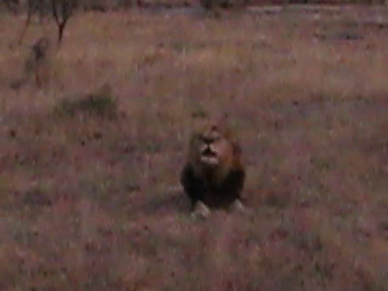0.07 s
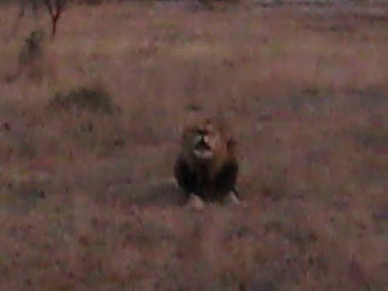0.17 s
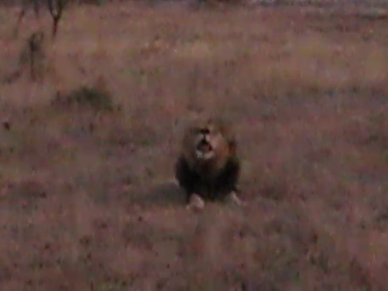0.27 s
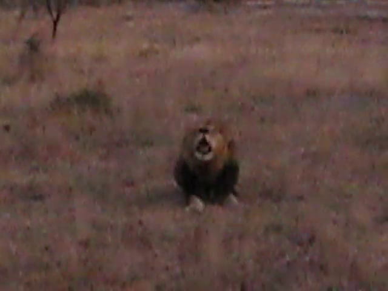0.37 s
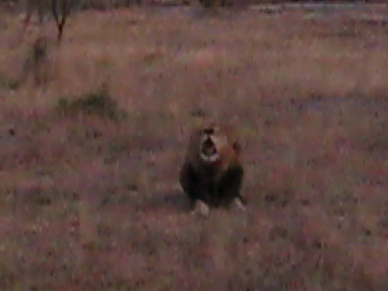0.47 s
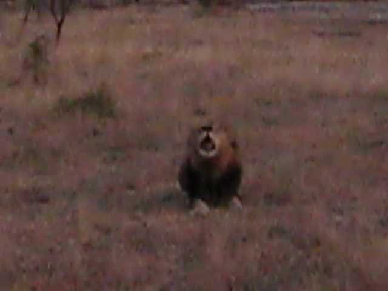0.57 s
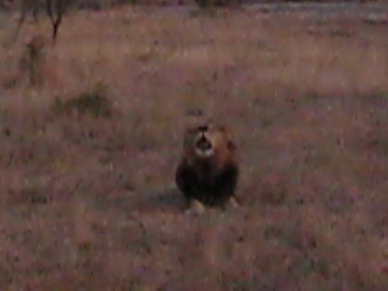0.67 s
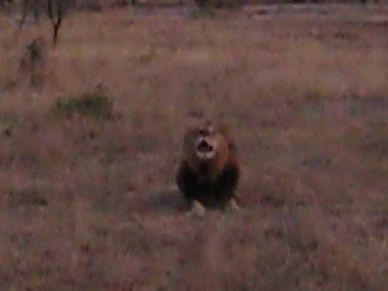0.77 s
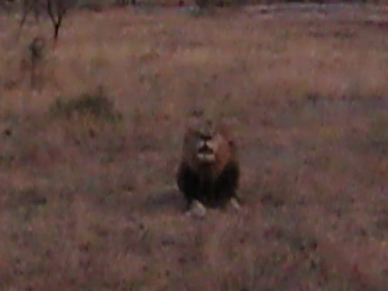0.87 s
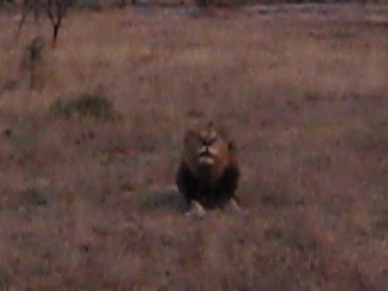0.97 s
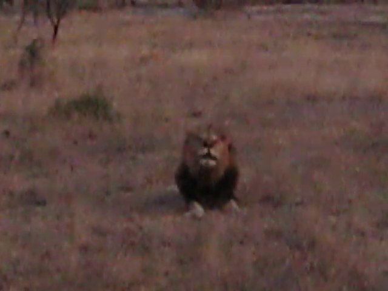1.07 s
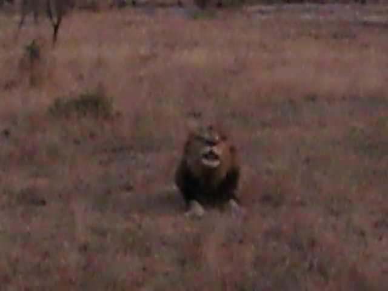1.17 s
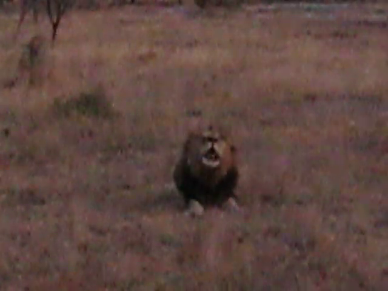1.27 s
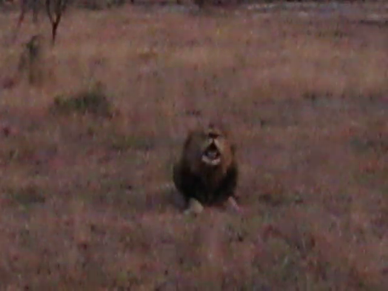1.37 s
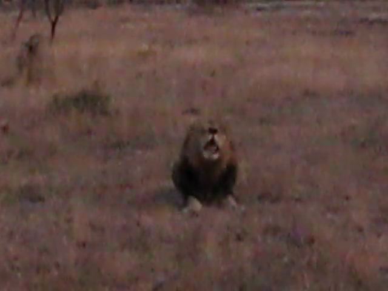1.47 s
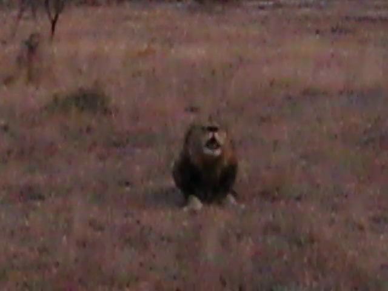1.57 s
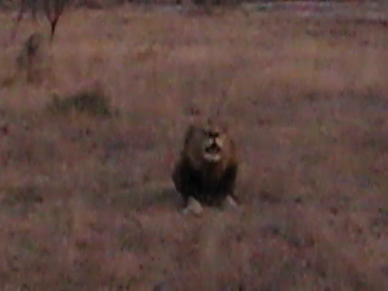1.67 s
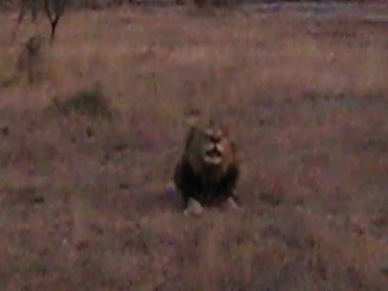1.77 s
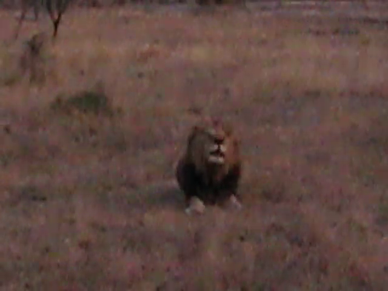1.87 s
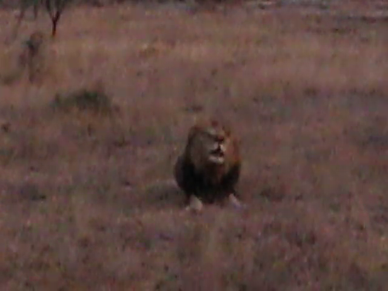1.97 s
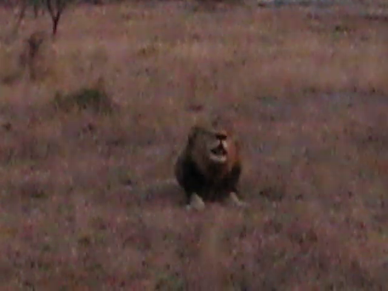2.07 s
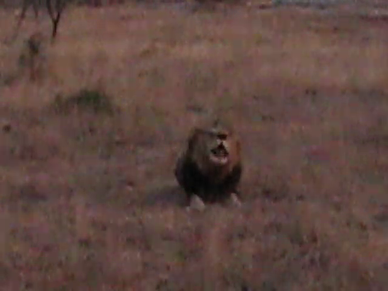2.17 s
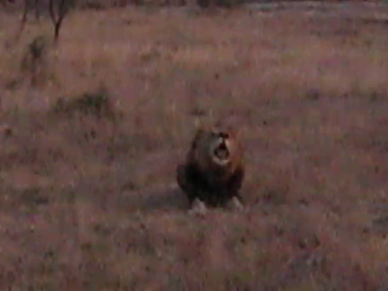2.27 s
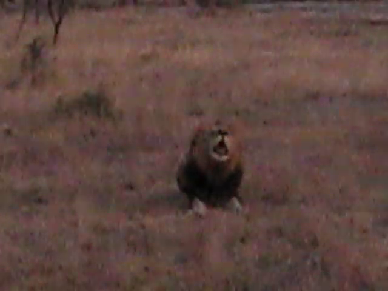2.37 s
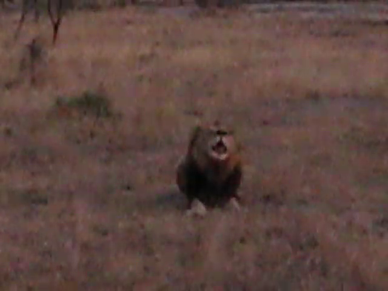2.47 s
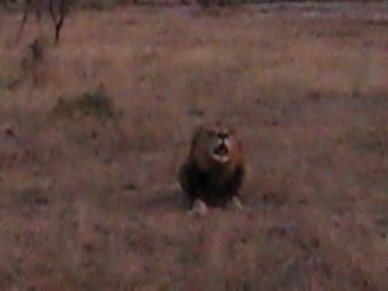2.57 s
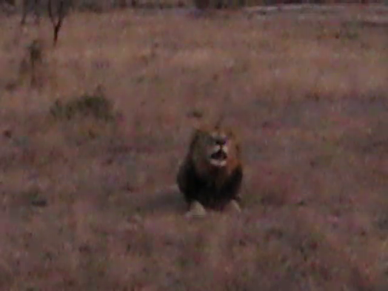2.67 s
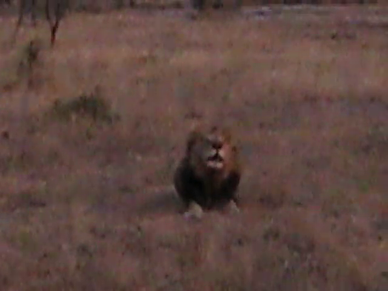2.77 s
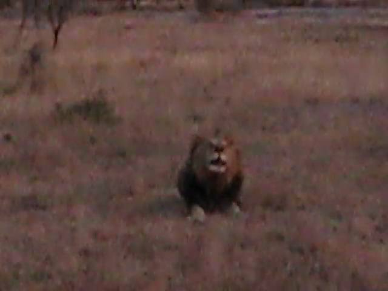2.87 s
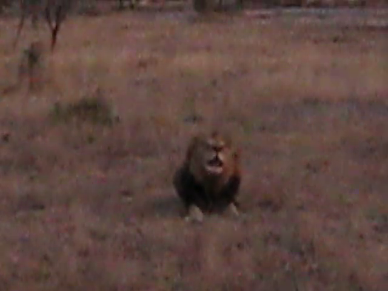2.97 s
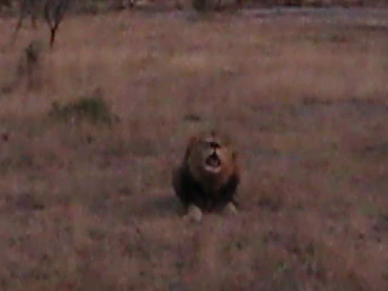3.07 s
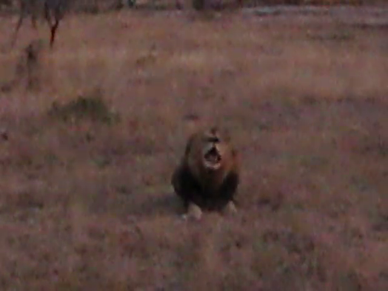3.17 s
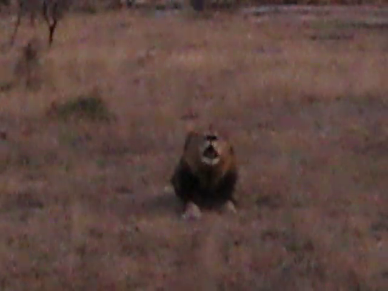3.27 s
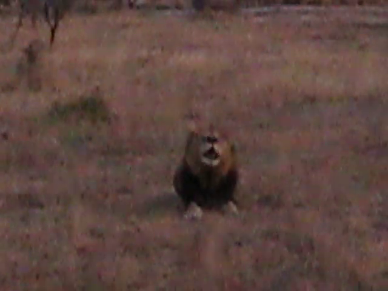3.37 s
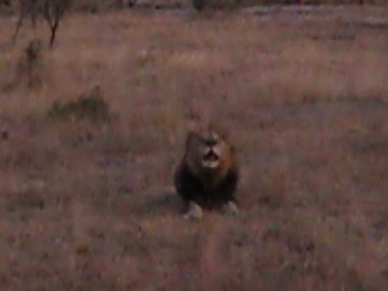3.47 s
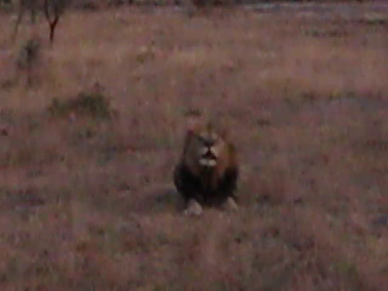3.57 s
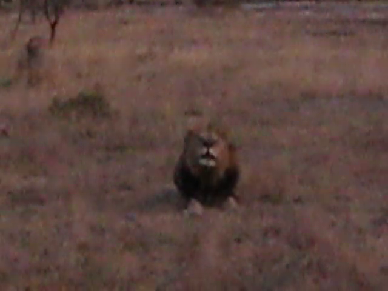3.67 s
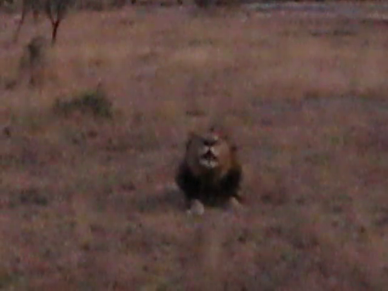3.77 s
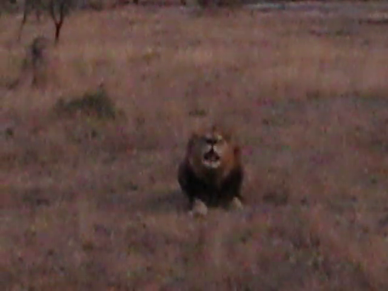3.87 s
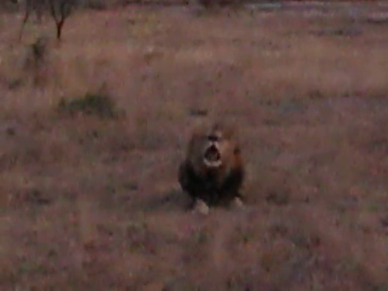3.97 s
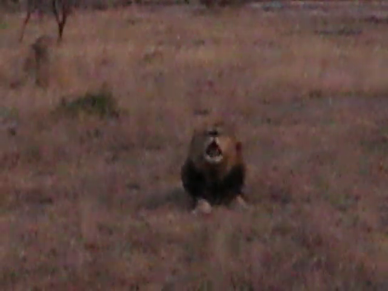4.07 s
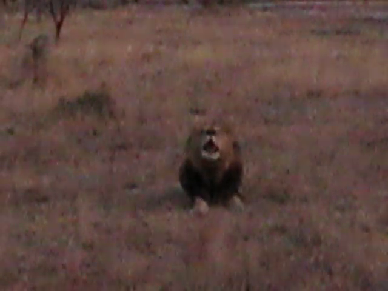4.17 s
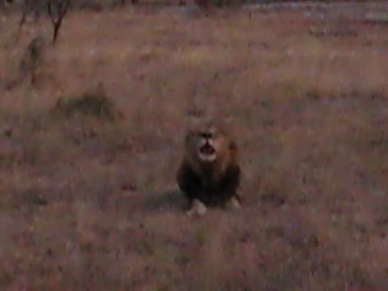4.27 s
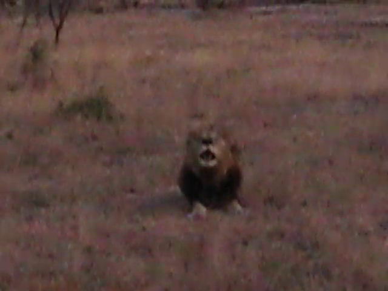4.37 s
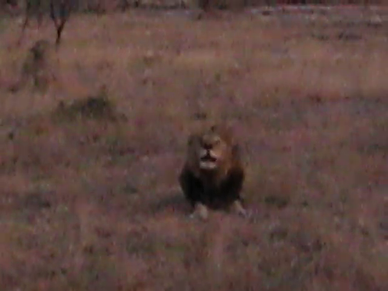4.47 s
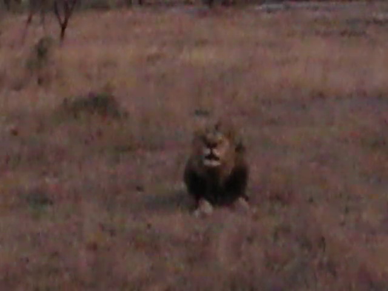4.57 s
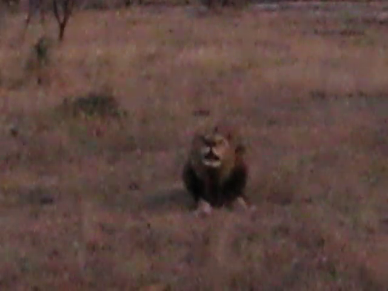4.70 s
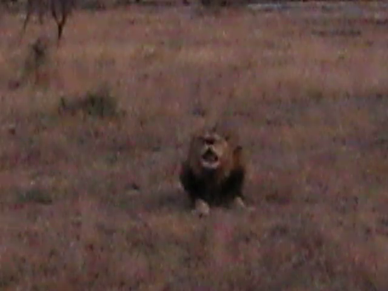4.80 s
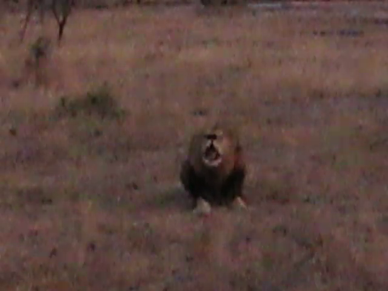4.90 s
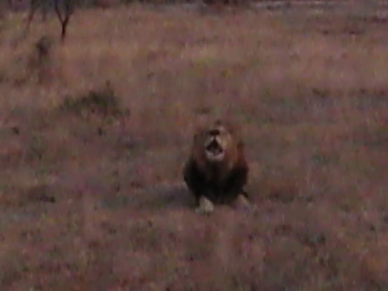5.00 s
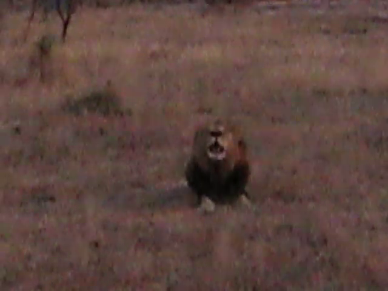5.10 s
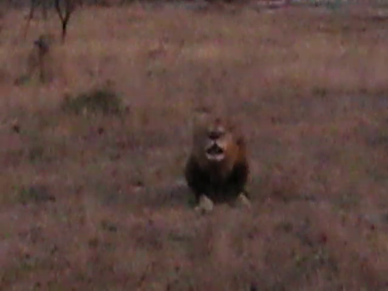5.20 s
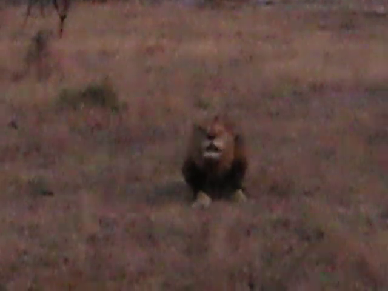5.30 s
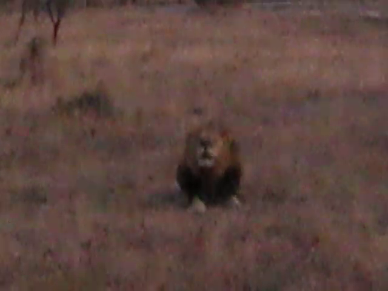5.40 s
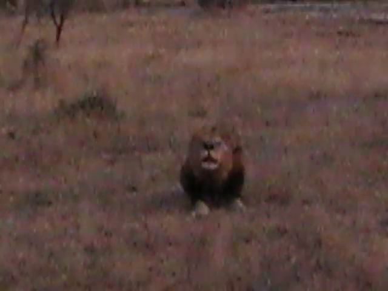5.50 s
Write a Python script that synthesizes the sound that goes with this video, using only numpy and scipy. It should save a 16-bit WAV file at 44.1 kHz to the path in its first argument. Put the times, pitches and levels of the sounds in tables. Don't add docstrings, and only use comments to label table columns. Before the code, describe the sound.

Outdoors at dusk, a lion's run of short grunting roars: hoarse inhale, hard low bark-like push, rough crumbling flaps, then inhale again. The first grunt has two joined pushes; five single ones follow, and a last drawn breath closes the run. Behind it lie steady microphone hiss and a thin high electronic whine, with a few tiny grass clicks and barely audible cricket trills. The place is open, with only a faint distant return.

```python
import sys
import numpy as np
from scipy import signal
from scipy.fft import rfft, irfft
from scipy.io import wavfile
from scipy.ndimage import uniform_filter1d

SR = 44100
rng = np.random.default_rng(int(sys.argv[2]) if len(sys.argv) > 2 else 0)


def amp(db):
    return 10 ** (np.asarray(db, float) / 20)


def write(x):
    x = np.atleast_2d(x).T
    wavfile.write(sys.argv[1], SR, np.round(np.clip(x, -1, 1) * 32767).astype(np.int16))


N = 244314

# f/Hz, density/dB per Hz
HISS = [(80, -12), (200, 0), (450, -3), (650, -5.5), (1400, -6), (4000, -8), (6200, -8), (7100, -11),
        (8700, -14), (10000, -10.5), (11700, -8.5), (13000, -13.5), (14400, -6.5), (15400, -6)]
HISS_DB = -47.5
# f/Hz, level/dB
WHINE = [(7558, -62.5), (8150, -80), (9378, -81), (15122, -69), (15149, -87), (15735, -86)]
# f/Hz, width/Hz, level/dB
WIND = [(55, 60, -72), (139, 9, -56.5)]

# start t/s, throat shuts t/s, flowing rasp level/dB, last rasp level/dB
BREATHS = [
    (.005, 0.343, -34, -33.5),
    (1.057, 1.325, -36, -34.5),
    (1.911, 2.21, -36.5, -32.5),
    (2.841, 3.099, -35.5, -39.5),
    (3.634, 3.936, -40, -33.5),
    (4.591, 4.833, -37.5, -36.5),
    (5.429, 5.7, -41.5, -36),
]
DRAW_S, FIRST_DRAW_DB, CLOSE_S = 0.13, -6.5, 0.034
# chest, throat, mouth rasp, brightness level/dB
DRAWN_DB = (-2.5, -6, 0.5, -3)
DRAWN_LATE_DB = (0, 5, 1.3, 0)
SHUT_DB, QUIET_DB = -40, -65.5

# t/s, peak level/dB, brightness level/dB
FLAPS = [(.2516, -13.5, -13), (.272, -13, -11), (.303, -17.5, -23), (.3277, -11.5, -3.5), (.4099, -6, -35),
         (.4273, -14, -7), (.6913, -9, -11), (1.1889, -16.5, -9), (1.3932, -13.5, -29), (1.4928, -6.5, -22),
         (2.1495, -13.5, -6.5), (2.1801, -5, -13), (2.2792, -9.5, -33), (2.308, -12.5, -4.5),
         (2.366, -19, -23), (2.9443, -25.5, -0.5), (3.0301, -14.5, -21), (3.0606, -20.5, -2),
         (3.0879, -13.5, -20), (3.1439, -11, -19), (3.1697, -10, -41), (3.266, -10.5, -12),
         (4.0163, -29, -22), (4.0426, -14.5, -5.5), (4.1177, -13, -20), (4.8079, -16, -10.5),
         (4.8929, -8, -35), (4.9142, -6.5, -33), (4.938, -4, -19), (5.0478, -14, -30)]
# first t/s, last t/s, first level/dB, middle level/dB, last level/dB
FLUTTERS = [(0.7587, 0.8367, -10, -7, -17), (1.583, 1.7194, -8.5, -5, -23.5),
            (2.462, 2.5892, -15, -11.5, -10.5), (3.2997, 3.4314, -14.5, -7, -19),
            (4.1946, 4.234, -12.5, -9.5, -19), (4.257, 4.337, -7.5, -9, -14.5),
            (5.0922, 5.211, -8.5, -11, -24)]
FLUTTER_BRIGHT_DB = (-10, -10, -8, -12.5, -16, -9.5, -14.5)
FLUTTER_COUNTS, SLOWING = (4, 6, 6, 6, 3, 4, 5), 1.2

# start t/s, note breaks t/s, flutter ends t/s, note level/dB, note level in the burst/dB
GRUNTS = [
    (0.397, .61, 0.57, -15.5, -17.5),
    (.612, 0.737, 0.84, -17, -15.5),
    (1.384, 1.602, 1.704, -18.5, -16),
    (2.265, 2.489, 2.61, -19.5, -14.5),
    (3.141, 3.31, 3.415, -17.5, -18),
    (3.995, 4.224, 4.375, -17.5, -20),
    (4.891, 5.077, 5.166, -16.5, -19),
]
# steady rasp level/dB, burst above it/dB, flutter against it/dB
AIRFLOW = [(-29.5, 5.5, -9), (-30, 1, 1), (-30, 5, -4.5), (-29, 4.5, 0.5), (-29, 6, 0), (-29, 7, 1),
           (-29.5, 5.5, 4)]
ATTACK_S, BURST_S, SETTLE_S, BREAK_S, FADE_S = 0.012, 0.04, 0.1, .022, 0.076
LAG = 0.62
HUM_ON_S, HUM_ON_DB = .05, -52.5
LINGER = 0.19
NOTE_SAG_DB, BROKEN_DB, FLUTTER_SAG_DB, LAST_RASP_DB = -1, -10, -4, -10.5
# level/dB, burst share, sag to the break/dB, flutter weakening share, burst quickness
THROAT_AIR = (-2, 1.78, -1.5, 0.7, 0.96)
BRIGHT_AIR = (-6, 0.54, 1.4, 1.23, 2)

# first f/Hz, risen f/Hz, last f/Hz, strong-weak pairing at first/0-1, pairing held/0-1
FOLDS = [(130, 147, 141, .1, .8), (137, 128, 134, .7, .7), (139, 141, 127, .5, .4), (124, 141, 136, .1, .1),
         (122, 139, 136, .1, .3), (120, 138, 136, .1, .15), (122, 139, 129, .1, .15)]
GRIP_S, RISE_S, LAST_PAIRING = .04, .08, .55
CLEAR_FIRST, CLEAR_HELD, CLEAR_LAST, CLEAR_BROKEN = .7, .96, .89, .15
# multiple of the note, level/dB
OVERTONES = [(2, -6), (3, 3), (4, -6), (5, -4), (6, -10), (1.5, -8), (2.5, -1), (3.5, -4), (4.5, -6),
             (5.5, -8)]

# f/Hz, width/Hz, level/dB
THROAT = [(290, 84, -1.5), (377, 186, -4), (511.7, 31, 2), (573, 38, -7), (715.5, 60, 3), (207, 68, -13.5)]
# f/Hz, width/Hz, level/dB
MOUTH = [(1102, 179, 2), (1321, 150, -2.5), (1474, 105, -4.5), (1686, 124, -0.5), (1886, 436, -6.5),
         (832, 136, -15)]
# f/Hz, width/Hz, level/dB
BRIGHT = [(2306, 340, -2.5), (2878, 620, -4), (3045, 470, 4), (3500, 320, -3), (4080, 574, 1.5),
          (5086, 224, -7), (5500, 410, -5.5), (6170, 930, -11.5)]
# f/Hz, width/Hz, level/dB
AIR = [(7500, 1250, 3.5), (9720, 1900, 2.5), (11400, 1300, 0), (13200, 2100, -3)]
# f/Hz, width/Hz, level/dB
THROAT_IN = [(298, 18, -4), (369, 63, 0.5), (530, 150, -5.5), (726, 51, 3.5)]
# f/Hz, width/Hz, level/dB
MOUTH_IN = [(930, 190, -2.5), (1123, 300, 2), (1367, 187, -5), (1660, 360, -2.5)]
# f/Hz, width/Hz, level/dB
BRIGHT_IN = [(2370, 290, -4.5), (2997, 325, 0.5), (3484, 670, -3.5), (4155, 420, 1), (4890, 660, -14.5),
             (5580, 330, -9), (6380, 580, -10)]

# delay t/s, level/dB
ECHOES = [(.43, -40), (.47, -39), (.53, -42), (.6, -45)]
# t/s, peak level/dB, f/Hz, ring/s
TICKS = [(.901, -39.5, 3380, 0.037), (2.711, -38, 8800, .003), (2.711, -36.5, 7900, .003),
         (3.105, -31, 9100, 0.0036), (3.104, -28, 5500, .004), (3.112, -41, 4200, .004),
         (3.126, -34, 4500, .004), (3.126, -31, 7500, .003), (5.274, -34.5, 3500, .01),
         (5.275, -34.5, 2150, 0.009), (5.479, -35, 2870, 0.0036)]
# start t/s, end t/s, level/dB
TRILLS = [
    (1.686, 2.034, -69.5),
    (3.415, 3.679, -73),
    (4.794, 5.354, -70),
]


def rms_one(x):
    return x / np.sqrt(np.mean(x ** 2) + 1e-20)


def gains(tables):
    t, out = np.arange(N) / SR, 0
    for rows in tables:
        s, *columns = np.transpose(rows)
        tracks = [amp(np.interp(t, s, column, left=-120, right=-120)) for column in columns]
        out = out + np.array(tracks)
    return uniform_filter1d(out, size=90, axis=1)


def resonate(x, hz, width_hz):
    r = np.exp(-np.pi * width_hz / SR)
    feedback = [1, -2 * r * np.cos(2 * np.pi * hz / SR), r * r]
    return signal.lfilter([(1 - r * r) / 2, 0, (r * r - 1) / 2], feedback, x)


def drift(rate_hz):
    r = np.exp(-2 * np.pi * rate_hz / SR)
    white = rng.standard_normal(N + 9000)
    return rms_one(signal.lfilter([1], [1, -2 * r, r * r], white)[9000:])


def tube(x, modes, patchy_db=0):
    wander = amp(1.45 * patchy_db * np.tanh(drift(16.7))) if patchy_db else np.ones(N)
    out = 0
    for k, (hz, width_hz, db) in enumerate(modes):
        ring = resonate(resonate(x, hz, 1.17 * width_hz), hz, 1.17 * width_hz)
        out = out + (-1) ** k * amp(db) * np.roll(wander, 20011 * k) * ring
    return out


def evened(x, span_s):
    return x / np.sqrt(uniform_filter1d(x ** 2, size=int(span_s * SR)) + 1e-12)


def hiss():
    hz = np.fft.rfftfreq(N, 1 / SR) + 1
    table_hz, table_db = np.transpose(HISS)
    colour = amp(np.interp(np.log(hz), np.log(table_hz), table_db))
    noise = rms_one(irfft(rfft(rng.standard_normal(N)) * colour, N))
    t = np.arange(N) / SR
    lines = sum(amp(db - 0.5) * np.sin(2 * np.pi * f * t) for f, db in WHINE)
    stir = tube(30 * rng.standard_normal(N), WIND)
    return amp(HISS_DB) * noise + lines + stir


def breath(start, shuts, flowing_db, last_db):
    s = [start, start + 0.63 * DRAW_S, start + DRAW_S, shuts, shuts + CLOSE_S]
    rasp = np.array([QUIET_DB, flowing_db + FIRST_DRAW_DB, flowing_db, last_db, last_db - 32.0])
    swelling = np.array([1, 1, 0, 0, 0])
    layers = [rasp + db + late * swelling for db, late in zip(DRAWN_DB, DRAWN_LATE_DB)]
    return np.transpose([s, *layers])


def all_flaps():
    rows = list(FLAPS)
    for (first, last, *db), count, bright_db in zip(FLUTTERS, FLUTTER_COUNTS, FLUTTER_BRIGHT_DB):
        along = np.linspace(0, 1, count)
        s = first + (last - first) * along ** SLOWING
        rows += zip(s, np.interp(along, [0, .5, 1], db), np.full(count, bright_db))
    return rows


def flaps(bright, decay_s, noise, snap_db):
    s, peak_db, bright_db = np.transpose(all_flaps())
    at = ((s + .0006) * SR).astype(int)
    kicks = np.zeros(N)
    kicks[at] = amp(peak_db + bright * bright_db)
    snaps = amp(snap_db) * kicks
    kicks[at + int(.007 * SR)] += 0.097 * kicks[at]
    fall = signal.lfilter([1], [1, -np.exp(-1 / (decay_s * SR))], kicks + 1e-18)
    return signal.lfilter([.06], [1, -.94], fall) * noise + snaps


def grunt(push, airflow):
    start, breaks, end, note, early = push
    rasp, burst, flutter = airflow
    s = [start - ATTACK_S, start + ATTACK_S, start + BURST_S, start + SETTLE_S, breaks - BREAK_S,
         breaks + BREAK_S / 2, end, end + FADE_S, end + FADE_S + HUM_ON_S]
    broken = note + BROKEN_DB
    onset = early - 3.0 - LAG * max(note - early, 0)
    chest = [SHUT_DB, onset, early, note, note + NOTE_SAG_DB,
             broken, broken + FLUTTER_SAG_DB, HUM_ON_DB, QUIET_DB]
    opening = np.array([.7, 1, LINGER, 0, 0, 0])
    later = np.array([0, 0, 0, 1, 1, 1])
    weak = np.array([0, 0, 0, 0, flutter, flutter + LAST_RASP_DB])
    airway = []
    for db, share, sag, weaken, quick in [THROAT_AIR, (0, 1, 0, 1, 1), BRIGHT_AIR]:
        blown = rasp + db + share * burst * opening ** quick + sag * later + weaken * weak
        airway.append([SHUT_DB + db - 15.0, *blown, QUIET_DB, QUIET_DB - 7])
    return np.transpose([s, chest, *airway])


def folds(sounding):
    t, points, clear = np.arange(N) / SR, [], CLEAR_BROKEN
    for (start, breaks, *_), (first, risen, last, early, held) in zip(GRUNTS, FOLDS):
        end = breaks - BREAK_S
        points += [(start, first, early),
                   (start + GRIP_S, first + (risen - first) / 4, early),
                   (start + RISE_S, risen, held),
                   (end - GRIP_S / 2, last + (risen - last) / 5, held),
                   (end, last, max(held, LAST_PAIRING))]
        s = [start, start + GRIP_S, end - GRIP_S, end, breaks + BREAK_S / 2]
        shares = [CLEAR_FIRST, CLEAR_HELD, CLEAR_HELD, CLEAR_LAST, CLEAR_BROKEN]
        clear = np.maximum(clear, np.interp(t, s, shares, left=0))
    s, pitch_hz, pairing = np.transpose(points)
    cycles = np.cumsum(np.interp(t, s, pitch_hz) * (1 + .006 * drift(25))) / SR
    return cycles, clear * sounding, np.interp(t, s, pairing)


def overtones(cycles, pairing):
    out, flicker = 0, drift(12)
    for k, db in OVERTONES:
        share = pairing if k % 1 else 1 - pairing
        sway = amp(db + 2.5 * np.roll(flicker, int(k * 31000)))
        out = out + np.sqrt(share) * sway * np.sin(2 * np.pi * k * cycles - 1.51 * k)
    return rms_one(out)


def lion():
    out = gains(map(grunt, GRUNTS, AIRFLOW))
    drawn = gains(breath(*row) for row in BREATHS)
    level = out + drawn
    exhaling = uniform_filter1d(1. * (out[2] > drawn[2]), size=200)
    inhaling = 1 - exhaling
    cycles, clear, pairing = folds(out[0] > drawn[0])
    white = rng.standard_normal((4, N))

    note = amp(1.4 * drift(10)) * np.sqrt(2) * np.sin(2 * np.pi * cycles)
    hum_out = evened(tube(white[0], [(134, 28, 0), (195, 36, -9)]), .04)
    hum_in = evened(tube(white[0], [(160, 45, 0), (205, 40, -13)]), .09)
    chest = out[0] * (np.sqrt(clear) * note + np.sqrt(1 - clear) * hum_out) + drawn[0] * hum_in

    opening = np.exp(1.1 * clear * np.cos(2 * np.pi * (cycles - .2)))
    low_air = evened(white[1] * opening * amp(1.7 * drift(69)), 0.0345)
    high_air = evened(white[2] * opening ** 0.32 * amp(4.7 * np.tanh(drift(55))), 0.0197)

    jitter = (.03 + .1 * pairing) * drift(120)
    closing = np.diff(np.maximum.accumulate(np.floor(cycles - .12 + jitter)), prepend=0)
    strong_weak = np.sign(np.sin(np.pi * cycles))
    pulses = 13 * clear * closing * amp(3.5 * white[3] + 4 * pairing * strong_weak)

    slap = evened(white[3], .0015)
    tonal = np.clip(.99 * clear * (1 - .3 * pairing), 0, 1)
    throat_noise = rms_one(tube(low_air, THROAT, patchy_db=2.5))
    throat = out[1] * (np.sqrt(tonal) * overtones(cycles, pairing) + np.sqrt(1 - tonal) * throat_noise)
    throat += drawn[1] * rms_one(tube(low_air, THROAT_IN, patchy_db=7.0))

    mouth_in = level[2] * (np.sqrt(1 - 0.21 * clear) * low_air + pulses)
    mouth_in += amp(-9.0) * flaps(bright=0, decay_s=0.0065, noise=slap, snap_db=16.5)
    mouth = tube(exhaling * mouth_in, MOUTH, patchy_db=3.5)
    mouth = amp(14.5) * (mouth + tube(inhaling * mouth_in, MOUTH_IN, patchy_db=1.5))

    bright_in = level[3] * high_air
    bright_in += amp(-6) * flaps(bright=1, decay_s=0.0073, noise=slap, snap_db=17)
    bright = tube(exhaling * bright_in, BRIGHT, patchy_db=3.0)
    bright = amp(12.5) * (bright + tube(inhaling * bright_in, BRIGHT_IN, patchy_db=5.5))

    blowing = amp(-8) * out[1] * clear * high_air
    air = amp(-7.5) * tube((exhaling + 0.96 * inhaling) * bright_in + blowing, AIR, patchy_db=-2.5)

    knocks = flaps(bright=0, decay_s=0.004, noise=slap, snap_db=11.0)
    throat += amp(4) * tube((exhaling + 0.5 * inhaling) * knocks, THROAT)

    thump = (1 - clear) * (amp(11.5) * out[1] + amp(10.5) * drawn[1]) * white[2]
    rumble = tube(thump, [(66, 130, 7.9)])
    return chest + rumble, throat + mouth + bright + air


def ground(x):
    t = np.arange(int(.12 * SR)) / SR
    tail = rng.standard_normal(len(t)) * amp(-60 * t / 0.14) * (t > .004)
    dull_tail = signal.lfilter([.3], [1, -.6], tail)
    return amp(-31.5) * signal.fftconvolve(x, dull_tail)[:N]


def tree_line(x):
    low = tube(x, [(131, 72, 0)])
    return sum(amp(db) * np.pad(low, (int(lag_s * SR), 0))[:N] for lag_s, db in ECHOES)


def ticks():
    out = np.zeros(N)
    for s, db, hz, ring_s in TICKS:
        at = int(s * SR)
        t = np.arange(N - at) / SR
        out[at:] += amp(db) * np.exp(-np.log(1000) * t / ring_s / 2) * np.sin(2 * np.pi * hz * t)
    return out


def cricket():
    t, out = np.arange(N) / SR, np.zeros(N)
    for start, end, db in TRILLS:
        stroke = ((t - start) * 61.0) % 1
        hz = 6850 - 1150 * stroke
        shape = np.sin(np.pi * np.clip(stroke / 0.77, 0, 1)) ** 2
        tone = np.sin(2 * np.pi * np.cumsum(hz) / SR)
        out += amp(db + 20.5) * shape * (t > start) * (t < end) * tone
    return out


def scene():
    chest, airway = lion()
    voice = chest + airway + ground(airway) + tree_line(chest)
    return (voice + ticks() + cricket() + hiss())[None]


def top_cut(x):
    return signal.sosfilt(signal.butter(12, 16000, fs=SR, output="sos"), x)


def record(dry):
    cut = signal.ellip(12, .2, 80, 15750, fs=SR, output="sos")
    limited = 1.1 * np.tanh(dry / 1.1)
    return top_cut(signal.sosfilt(cut, limited))


dry = scene()
out = record(dry)
write(out)
```